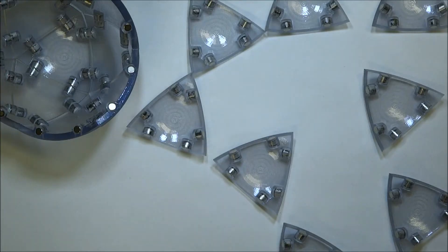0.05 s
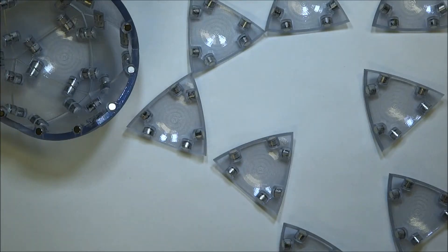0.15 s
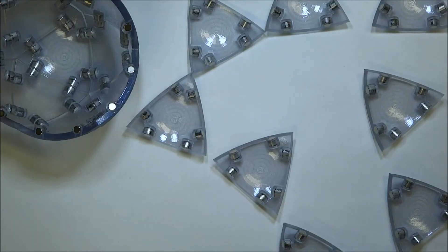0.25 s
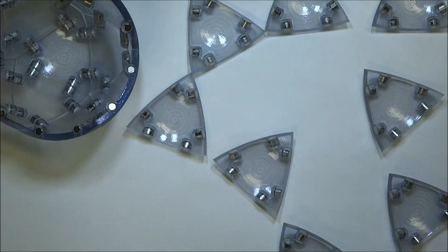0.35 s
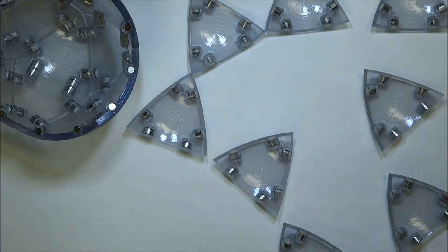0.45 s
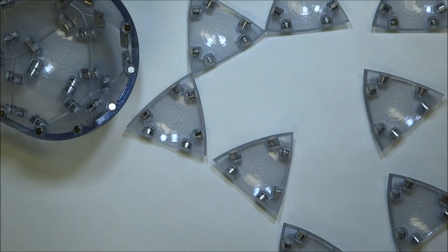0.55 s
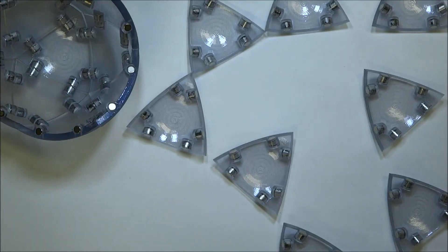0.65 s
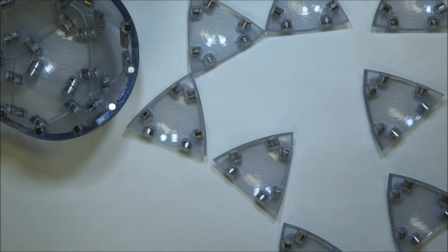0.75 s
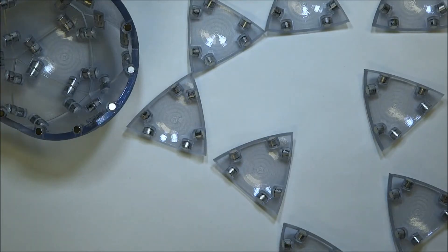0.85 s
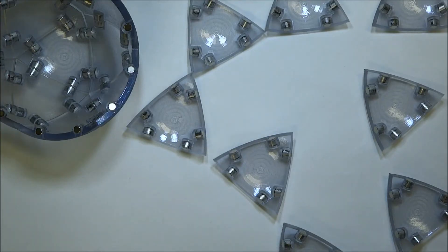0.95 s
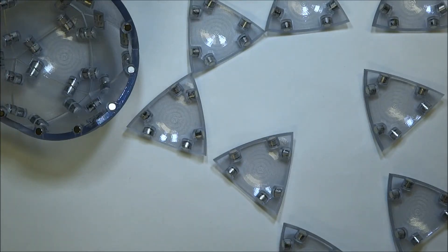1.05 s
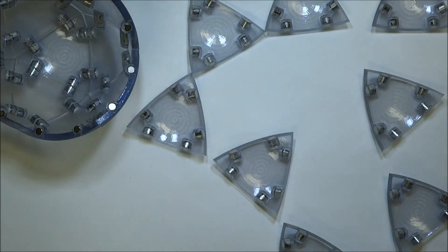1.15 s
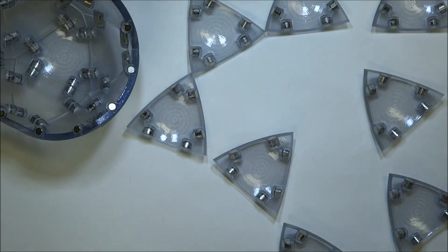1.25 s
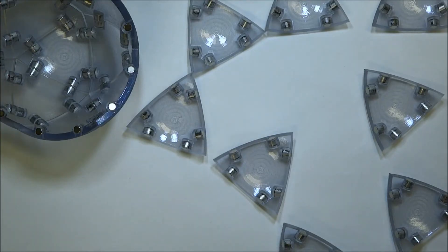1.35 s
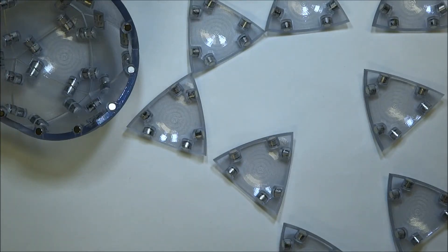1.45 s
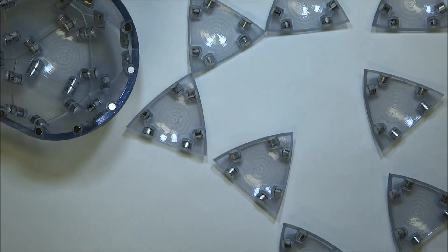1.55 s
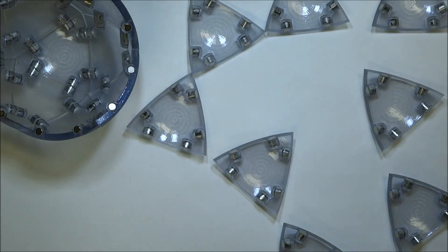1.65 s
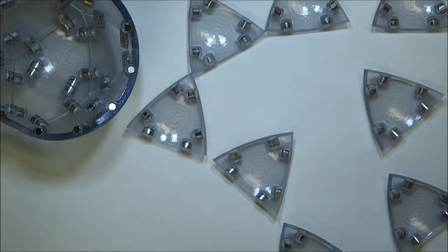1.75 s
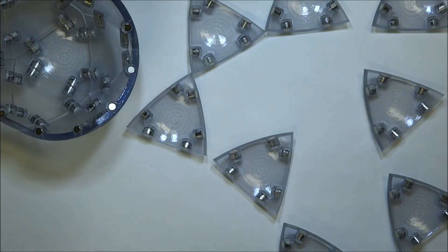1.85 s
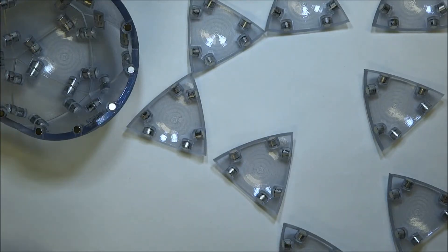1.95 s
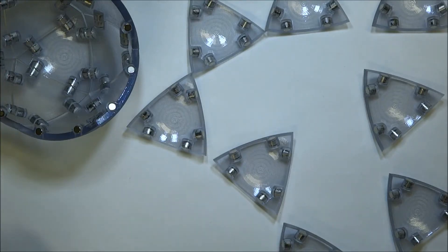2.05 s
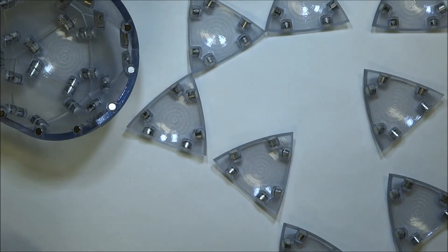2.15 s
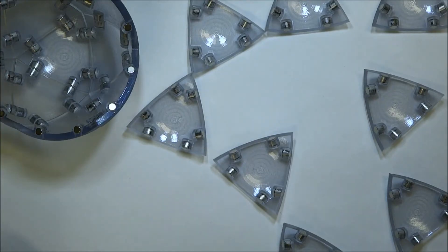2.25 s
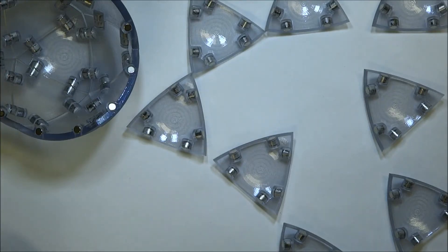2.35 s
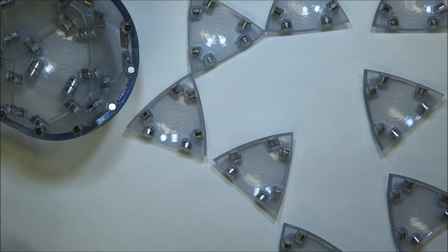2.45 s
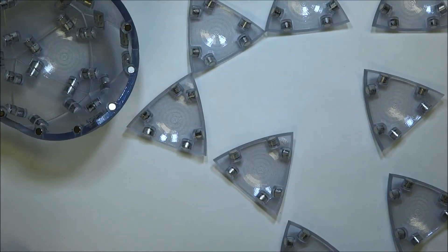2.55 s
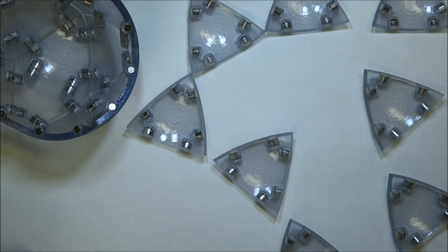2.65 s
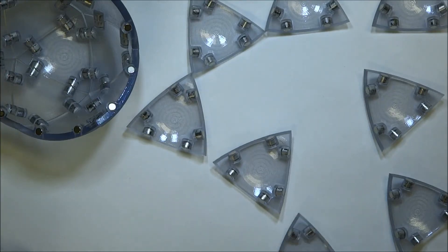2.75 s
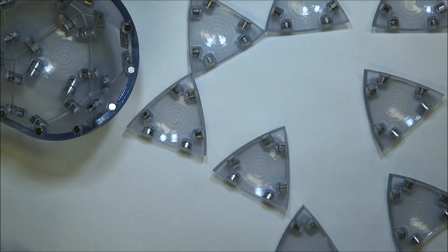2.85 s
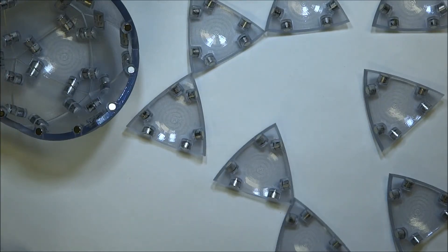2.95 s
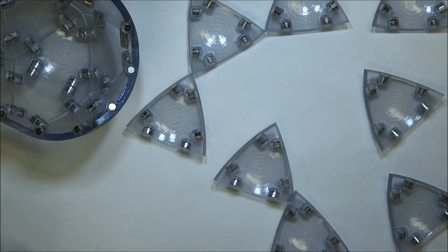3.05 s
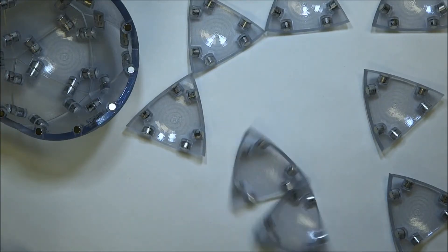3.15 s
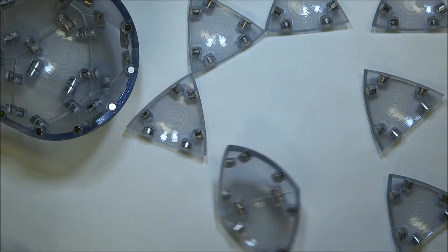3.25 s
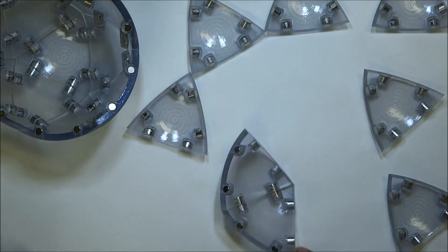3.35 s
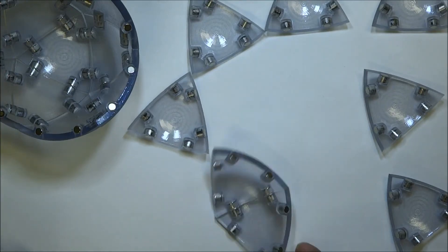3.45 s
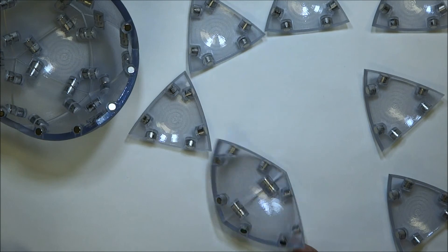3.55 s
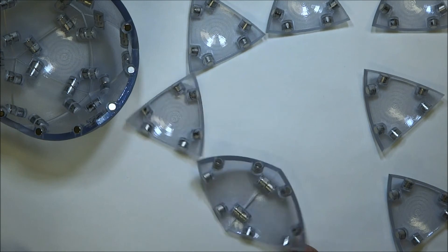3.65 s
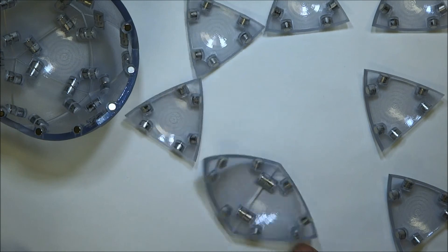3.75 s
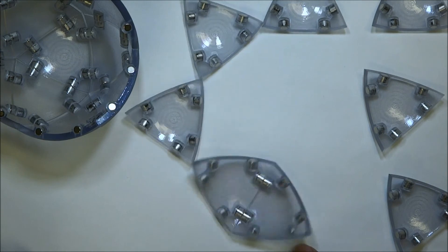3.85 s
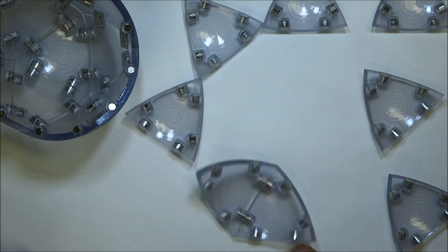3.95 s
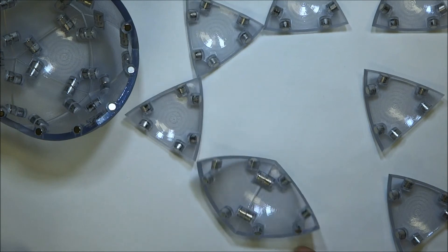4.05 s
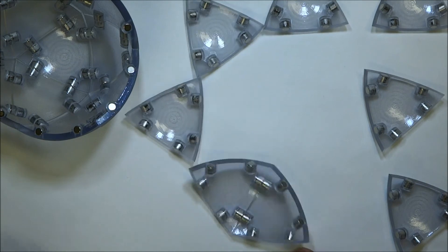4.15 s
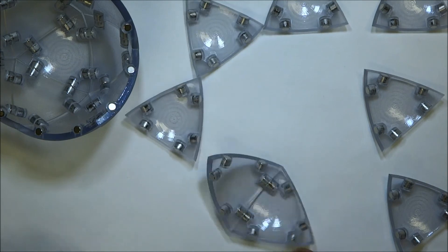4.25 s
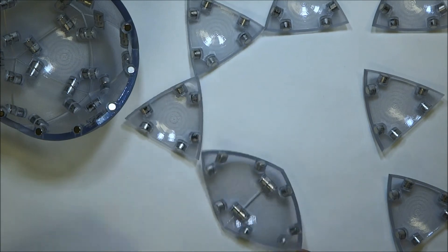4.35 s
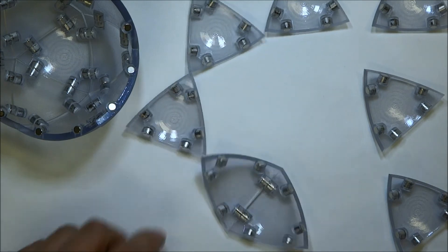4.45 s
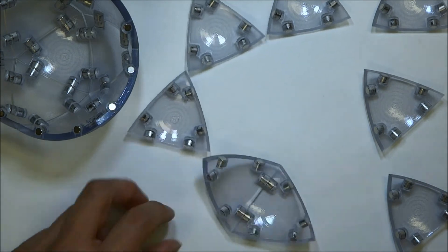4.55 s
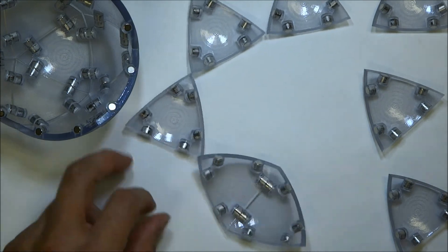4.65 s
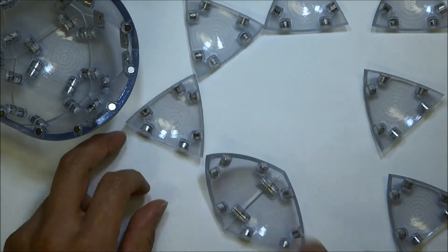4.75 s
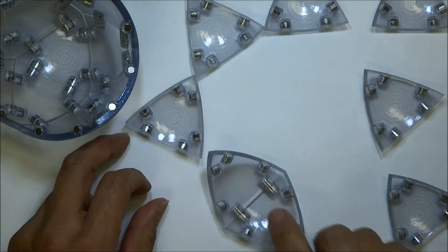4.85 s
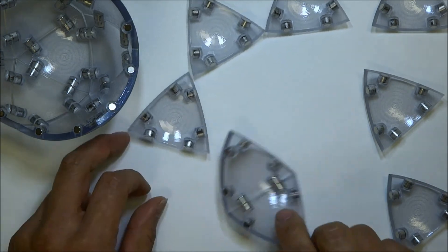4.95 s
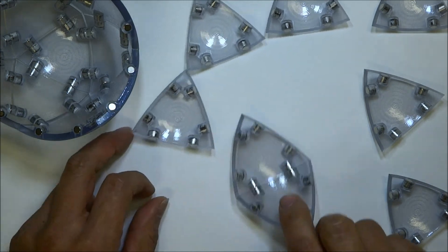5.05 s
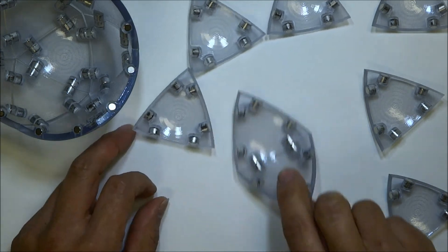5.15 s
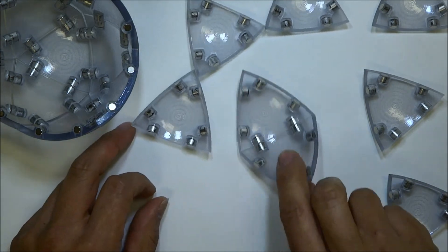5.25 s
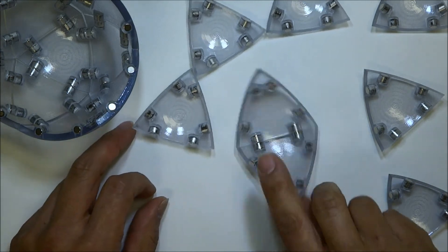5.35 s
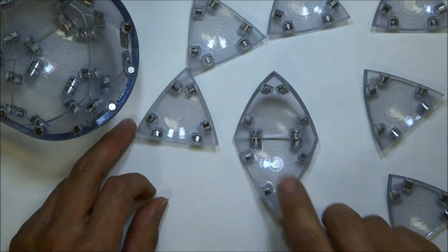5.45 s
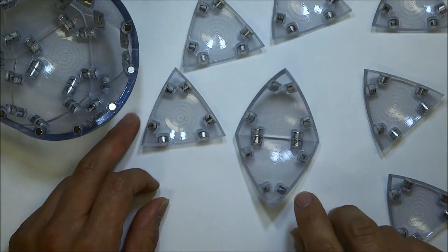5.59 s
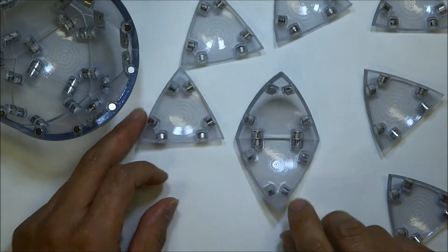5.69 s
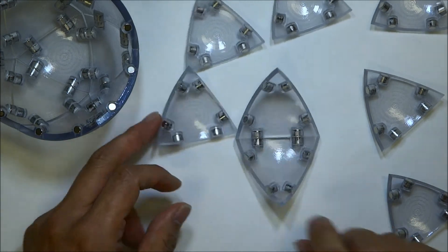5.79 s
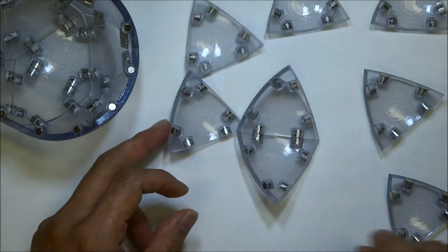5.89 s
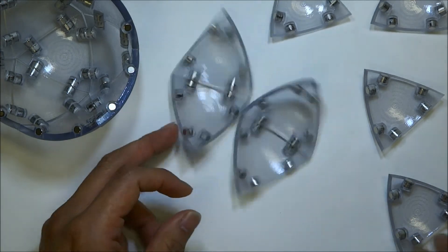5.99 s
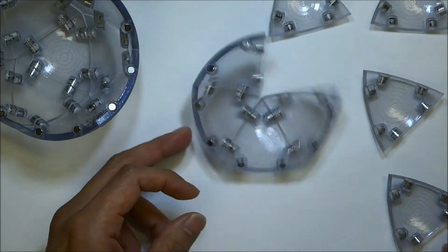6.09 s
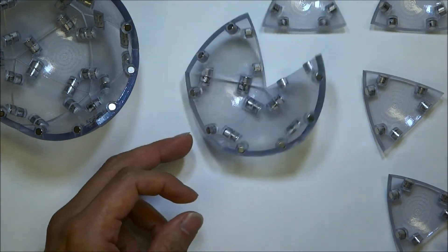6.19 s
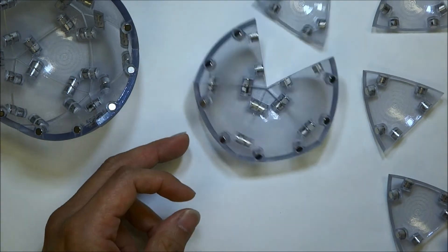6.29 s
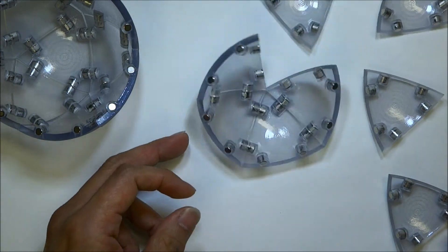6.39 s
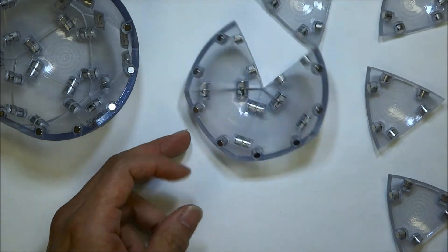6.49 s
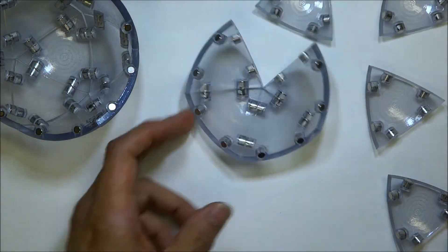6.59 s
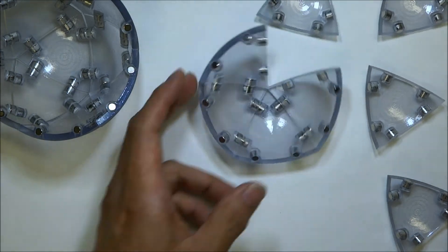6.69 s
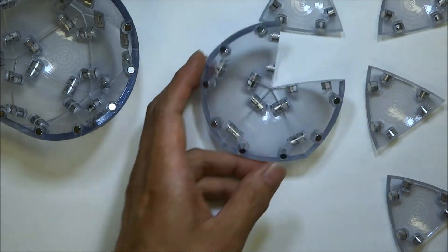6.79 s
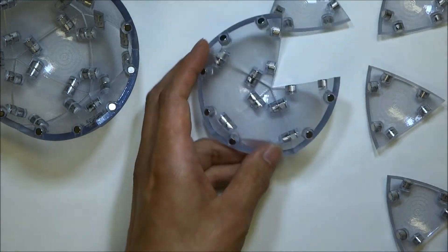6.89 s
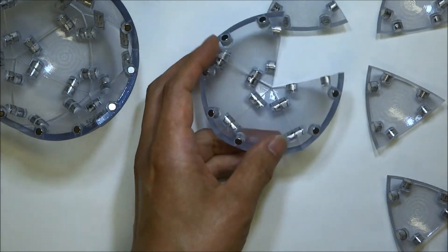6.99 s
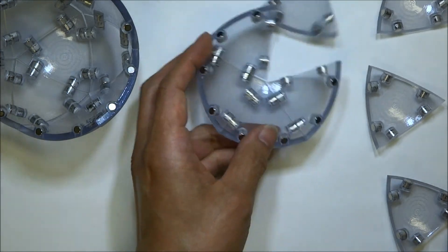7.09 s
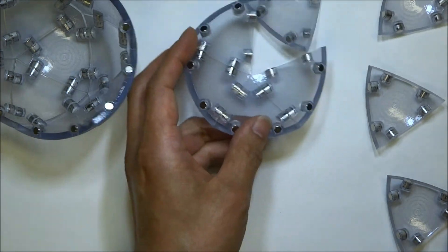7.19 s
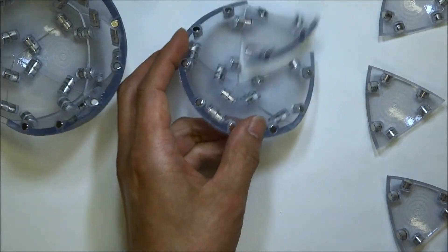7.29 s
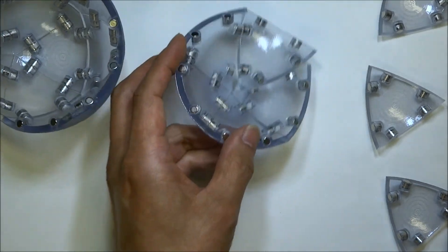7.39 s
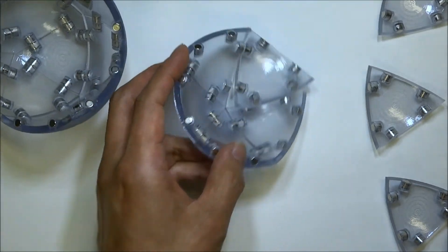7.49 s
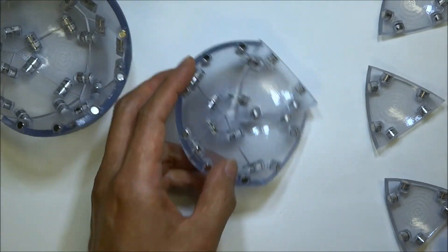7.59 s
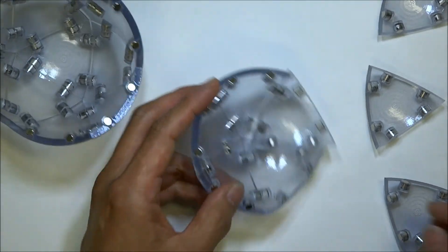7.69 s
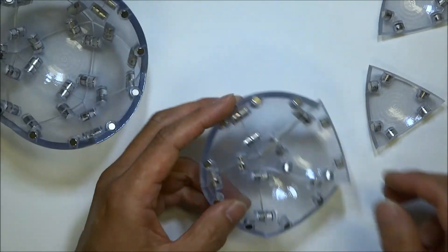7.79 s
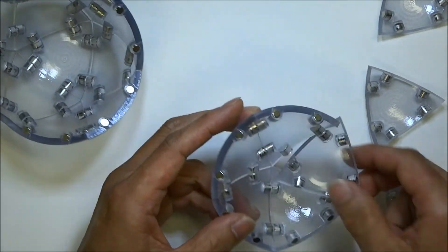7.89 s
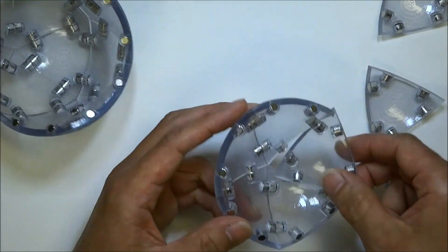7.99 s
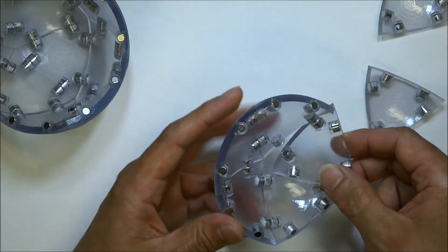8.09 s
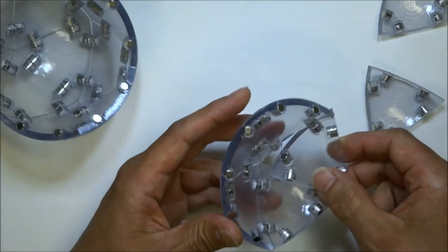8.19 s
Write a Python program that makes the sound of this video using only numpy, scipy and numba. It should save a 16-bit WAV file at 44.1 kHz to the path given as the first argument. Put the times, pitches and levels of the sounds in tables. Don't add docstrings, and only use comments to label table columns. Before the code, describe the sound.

After a quiet fan hum, magnetic plastic pieces snap shut in bright hard clusters, with table knocks, ticks and light finger brushes.

```python
import sys
import numpy as np
from scipy import signal
from scipy.fft import rfft, irfft, next_fast_len
from scipy.io import wavfile
from scipy.ndimage import uniform_filter1d, minimum_filter1d
from numba import njit

SR = 44100
rng = np.random.default_rng(int(sys.argv[2]) if len(sys.argv) > 2 else 0)


def int16_out(signal):
    q = np.round(np.clip(np.atleast_2d(signal).T, -1, 1) * 32767)
    wavfile.write(sys.argv[1], SR, q.astype(np.int16))


def convert_level_to_amplitude(level_db):
    exponent = np.asarray(level_db, float) / 20
    return 10 ** exponent


N = 362943
LEFT_RIGHT = np.array([[1], [-1]])


def coloured(gain_of_hz, size):
    fast = next_fast_len(size)
    hz = np.maximum(np.fft.rfftfreq(fast, 1 / SR), 1)
    spectrum = rfft(rng.standard_normal(fast)) * gain_of_hz(hz)
    return irfft(spectrum, fast)[:size]


def bell(centre_hz, octaves):
    return lambda hz: np.exp(-0.5 * (np.log2(hz / centre_hz) / octaves) ** 2)


def rms(x):
    return np.sqrt(np.mean(x ** 2))


def fans():
    # pitch_hz [Hz], level_db [dB per Hz]
    air_curve = [(12, -46), (20, -8.5), (68, -11.5), (120, -2.5), (154, -7.5), (277, -8), (434, -11.5),
                 (472, -15), (738, -16), (897, -12), (1260, -25), (3740, -27.5), (4810, -24.5),
                 (11100, -30.5), (16000, -37.5)]
    # pitch_hz [Hz], side_minus_mid_db [dB]
    side_curve = [(60, -17), (110, -24), (200, -9), (380, -6.5), (700, -10.5), (1290, -3), (2380, -4),
                  (4400, -7.5), (8120, -13), (15000, -12)]
    # pitch_hz [Hz], width_hz [Hz], over_noise_db [dB]
    hum = [(103, 14.4, 6), (126.8, 4.87, 15), (360.5, 11, 4), (430.3, 1.75, 18), (511.4, 7.4, 7),
           (875.3, 27.6, 12.5), (915, 9.8, 6), (964.4, 6.1, 11.5), (1412, 186, 4.5), (1658, 34, 6.5),
           (13700, 1200, 1), (2375, 50, 4), (4500, 210, 0), (6500, 1700, 1), (10900, 230, 3)]
    # pitch_hz [Hz], level_db [dB]
    whine_tones = [(3945, -69), (4738, -55), (5048, -57.5), (5379, -61), (9476, -67), (15740, -80)]
    air_db, drift_db, waver_rad = -31.5, 0.76, 1.47

    def curve(rows, hz):
        curve_hz, curve_db = np.array(rows).T
        return convert_level_to_amplitude(np.interp(np.log(hz), np.log(curve_hz), curve_db))

    def mid_gain(hz):
        peaks = sum(convert_level_to_amplitude(db) ** 2 / (1 + (2 * (hz - peak_hz) / width_hz) ** 2) for peak_hz, width_hz, db in hum)
        return curve(air_curve, hz) * np.sqrt(1 + peaks)

    mid = coloured(mid_gain, N)
    side = coloured(lambda hz: mid_gain(hz) * curve(side_curve, hz), N)
    drift = coloured(bell(1.5, 2.6), N)
    level = convert_level_to_amplitude(air_db + drift_db * drift / rms(drift)) / rms(mid)
    air = level * (mid + side * LEFT_RIGHT)
    air *= convert_level_to_amplitude(0.15 * LEFT_RIGHT)
    t = np.arange(N) / SR
    waver = coloured(bell(2.4, 1.05), N)
    phase = waver_rad * waver / rms(waver)
    whine = sum(convert_level_to_amplitude(db) * np.sin(2 * np.pi * hz * t + phase) for hz, db in whine_tones)
    return air + np.sqrt(2) * whine


def stick_slip(rows, octaves):
    out = np.zeros(N + SR)
    for start_s, length_s, level_db, centre_hz in rows:
        size, start = int(length_s * SR), int(start_s * SR)
        steps_db = 2.2 * np.repeat(rng.standard_normal(SR // 64), 64)[:size]
        hiss = coloured(bell(centre_hz, octaves), SR // 2)[:size] * convert_level_to_amplitude(steps_db)
        fade = signal.windows.tukey(size, 0.75)
        out[start:start + size] += convert_level_to_amplitude(level_db) * hiss / rms(hiss) * fade
    return out[:N]


def brushes():
    strokes = [
        (2.747, 0.38, -52, 7040),
        (4.403, 0.057, -35, 6500),
        (5.036, .1, -34, 11500),
        (5.215, .075, -33.5, 7400),
        (5.801, 0.091, -39.5, 8000),
        (6.04, 0.065, -38, 4500),
        (6.93, 0.083, -46, 7100),
        (7.124, 0.026, -32, 6500),
        (7.26, .08, -45.5, 6000),
        (7.879, 0.14, -35.5, 6500),
    ]
    return stick_slip(strokes, octaves=1.4)


def burst(hz, octaves, t60, t):
    noise = coloured(bell(hz, octaves), len(t))
    return noise / rms(noise) * convert_level_to_amplitude(-60 * t / t60)


def ring(modes, db, t, near_hz=1000.0, reach_db=0.0):
    scatter_db, detune = 1.8, 0.0079
    push_db, push_cycles = -3.5, 11.2
    hz, mode_db, t60 = np.array(modes).T[:, :, None]
    chance = rng.standard_normal((2, len(modes), 1))
    sense = (-1.0) ** np.arange(len(modes))[:, None]
    far_db = reach_db * np.log2(hz / near_hz) ** 2
    gain = sense * convert_level_to_amplitude(db + mode_db + scatter_db * chance[1] - far_db) / np.sqrt(len(modes))
    tone = gain * np.sin(2 * np.pi * hz * (1 + detune * chance[0]) * t)
    push = convert_level_to_amplitude(push_db - 60 * t * hz / push_cycles)
    return np.sum(tone * (convert_level_to_amplitude(-60 * t / t60) + push), axis=0)


def strike(out, start_s, main_hz, shell_db, magnet_db, knock_db, table_db):
    # pitch_hz [Hz], level_db [dB], t60_s [s]
    shell_modes = [(1900, -21, 0.007), (2400, -1, 0.0063), (3210, 9, 0.01), (3570, 6.5, 0.014),
                   (3940, -17, 0.005), (4370, 6.5, 0.0086), (5000, 10, 0.0062), (5350, 2.5, 0.017),
                   (5910, 13, 0.0044)]
    magnet_modes = [(6860, 3, 0.017), (7320, 9, 0.007), (8850, 9, 0.0039), (10050, -11, 0.0085),
                    (10600, -4, .004), (11150, 3.5, 0.0054), (12800, -10, 0.0043), (14400, -12, .005)]
    knock_modes = [(724, -11, 0.015), (956, 1.5, 0.052), (1220, -1.5, 0.042), (1574, 3.5, 0.013),
                   (1625, -18, 0.025), (2080, 0, 0.0068)]
    table_modes = [(127, -3, 0.086), (263.7, 0.5, 0.14), (334, -2, 0.047), (422, 1.5, 0.029),
                   (571, 6.5, 0.025), (666, 0.5, 0.027)]
    dome_hz, free_t60_s, clamped_t60_s = 3230, 0.032, 0.0092
    crack_db, rattle_db, rattle_t60_s, rumble_db = 2.5, -14.5, 0.049, -5.5

    t = np.arange(SR // 8) / SR
    rings_free = abs(main_hz - dome_hz) < 180 and shell_db < -4
    t60 = free_t60_s if rings_free else clamped_t60_s
    sense = (-1.0) ** np.argmin(np.abs(np.array(shell_modes)[:, 0] - main_hz))
    blow = sense * convert_level_to_amplitude(shell_db + 3.5 - 60 * t / t60) * np.sin(2 * np.pi * main_hz * t)
    blow += ring(shell_modes, shell_db, t, main_hz, reach_db=18.0)
    blow += ring(magnet_modes, magnet_db, t)
    blow += ring(knock_modes, knock_db, t)
    blow += ring(table_modes, table_db, t)
    blow += convert_level_to_amplitude(magnet_db + crack_db) * burst(9800.0, 0.6, 0.0054, t)
    blow += convert_level_to_amplitude(shell_db + rattle_db) * burst(main_hz, 0.3, rattle_t60_s, t)
    blow += convert_level_to_amplitude(magnet_db + rattle_db) * burst(11700.0, 1.0, rattle_t60_s, t)
    blow += convert_level_to_amplitude((knock_db + table_db) / 2 + rumble_db) * burst(700, 0.76, 0.11, t)
    start = int(start_s * SR)
    out[start:start + len(t)] += blow * np.minimum(t / 0.00034, 1)


def thuds():
    bumps = [
        (3.033, -28.5),
        (3.071, -27.5),
        (3.619, -20),
        (5.241, -32),
        (6.596, -21.5),
        (6.719, -27.5),
        (7.003, -26),
    ]
    out = np.zeros(N + SR)
    for start_s, table_db in bumps:
        strike(out, start_s, 3700, table_db - 30, table_db - 30, table_db - 16, table_db)
    return out[:N]


def ticks():
    touches = [(3.033, 3220, -36.5, -30), (4.4, 5970, -29, -28), (4.459, 5860, -31, -27),
               (4.998, 4500, -33, -46), (5.51, 5500, -53, -32), (5.241, 5250, -31, -46),
               (5.895, 2900, -30, -36), (6.0236, 2690, -23, -27), (6.088, 4700, -30, -43),
               (6.9843, 2620, -20, -24), (7.281, 3200, -35, -63), (7.325, 4500, -33, -50),
               (7.3935, 3160, -30, -71), (7.89, 2980, -35, -24.5), (7.937, 6000, -35, -31)]
    out = np.zeros(N + SR)
    for start_s, main_hz, shell_db, magnet_db in touches:
        strike(out, start_s, main_hz, shell_db, magnet_db, shell_db - 23, shell_db - 16)
    return out[:N]


def skids():
    scrapes = [
        (3.238, 0.037, -34.5, 700),
        (3.404, 0.054, -17, 1700),
        (3.404, 0.072, -22.5, 590),
        (5.865, 0.07, -26.5, 814),
        (6.025, 0.048, -25, 790),
        (6.259, .11, -27.5, 76),
        (6.264, 0.0476, -14, 1500),
        (6.993, 0.043, -32.5, 280),
        (7.4165, 0.025, -26.5, 1820),
    ]
    return stick_slip(scrapes, octaves=0.41)


def landings():
    rocks = [
        (3.246, -32, -22.5),
        (3.253, -29, -29),
        (3.7051, -8, -14),
        (5.861, -16, -17),
        (5.921, -24, -19),
        (5.979, -23, -20),
        (6.0355, -16, -17),
        (6.178, -7.5, -12.5),
        (6.271, -19, -15),
        (6.285, -24, -18),
    ]
    out = np.zeros(N + SR)
    for start_s, knock_db, table_db in rocks:
        strike(out, start_s, 3700, knock_db - 14, knock_db - 19, knock_db, table_db)
    return out[:N]


def snaps():
    closings = [(3.2906, 4100, 9.5, 5.5, -6.5), (3.295, 3870, 5.5, 6.5, -12), (3.322, 3930, -4, -24, -6),
                (3.3996, 3880, 8.5, -12, 1.5), (3.408, 5600, -3, -8, -19), (3.6931, 3210, -16.5, -25, -12),
                (6.1026, 3900, 12, 14.5, -5), (6.105, 3460, -11, -1, -15), (6.188, 5240, -10, -30, -8),
                (6.1938, 3670, 8.5, 2, -2.5), (6.205, 4000, 12.5, 6, -14), (6.2134, 5000, -22, -18, -11),
                (3.7053, 2410, -24, -50, -34), (6.221, 3480, -16, -26, -11), (6.2587, 2600, 1, -15, 0),
                (7.4181, 4170, -9, -13.5, -38)]
    out = np.zeros(N + SR)
    for start_s, main_hz, shell_db, magnet_db, knock_db in closings:
        strike(out, start_s, main_hz, shell_db, magnet_db, knock_db, knock_db - 11)
    return out[:N]


def squeaks():
    drags = [
        (7.12, .044, -44, 4200),
        (7.2, .033, -45, 4400),
        (9.1, .043, -41, 4550),
        (7.97, 0.091, -40, 8700),
        (7.96, .14, -43, 7100),
    ]
    return stick_slip(drags, octaves=0.08)


def room(x):
    # pitch_hz [Hz], t60_s [s], level_db [dB], side_colour_db [dB]
    bands = [(179, 0.34, 3.5, -3), (405, 0.46, 4.5, 2), (895, 0.35, 2.5, -4.5), (1910, 0.32, 5, -1.5),
             (4000, 0.33, -4.5, -2.5), (7500, 0.34, -2.5, -3), (13000, 0.3, -6, -9)]
    room_db, side_level_db = -33, -9.5
    first_wall_s, build_s = 0.0028, 0.011
    ceiling_s, ceiling_db, ceiling_smear_s = 0.0125, -1.5, 0.0029
    t = np.arange(SR // 2) / SR
    swell = 1 - np.exp(-np.maximum(t - first_wall_s, 0) / build_s)
    swell += convert_level_to_amplitude(ceiling_db) * (t > ceiling_s) * np.exp(-np.abs(t - ceiling_s) / ceiling_smear_s)
    mid, side = np.zeros(len(t)), np.zeros(len(t))
    for hz, t60, db, side_db in bands:
        decay_db = db - 60 * t / t60
        mid += convert_level_to_amplitude(decay_db) * coloured(bell(hz, 0.53), len(t))
        side += convert_level_to_amplitude(decay_db + side_db) * coloured(bell(hz, 0.53), len(t))
    echo = convert_level_to_amplitude(room_db) * swell * (mid + convert_level_to_amplitude(side_level_db) * side * LEFT_RIGHT)
    return signal.fftconvolve(x[None], echo, axes=1)[:, :N]


def scene():
    air = fans()
    near = brushes() + thuds() + ticks() + skids() + landings() + snaps() + squeaks()
    return near + room(near) + air


@njit
def recover(need, step):
    gain, g = np.empty(len(need)), 1.0
    for i in range(len(need)):
        g = min(need[i], g + step * (1 - g))
        gain[i] = g
    return gain


def duck(x):
    threshold_db, knee_db, depth_db = -5, 8, -5
    fall_s, hold_s, back_s = 0.12, 0.67, 0.6
    peak_db = 20 * np.log10(np.abs(x).max(axis=0) + 1e-9)
    over = np.clip((peak_db - threshold_db) / knee_db, 0, 1)
    hold, fall = int(hold_s * SR) // 2, int(fall_s * SR) // 2
    need = minimum_filter1d(convert_level_to_amplitude(depth_db * over), 2 * hold + 1, origin=hold, mode="nearest")
    gain = recover(need, 1 / (back_s * SR))
    return uniform_filter1d(gain, 2 * fall + 1, origin=fall, mode="nearest")


def limit(x):
    ceiling, ahead_s, recover_s = 0.98, 0.0018, 0.018
    ahead = int(ahead_s * SR)
    need = np.minimum(ceiling / (np.abs(x).max(axis=0) + 1e-9), 1)
    need = minimum_filter1d(need, ahead + 1, origin=-(ahead // 2))
    gain = uniform_filter1d(recover(need, 1 / (recover_s * SR)), size=9)
    return np.clip(x * gain, -1, 1)


def top_cut(x):
    return signal.sosfilt(signal.butter(12, 16510, fs=SR, output="sos"), x)


def record(dry):
    band_limit = signal.ellip(10, 0.3, 60, 15770, fs=SR, output="sos")
    x = signal.sosfilt(band_limit, dry)
    x = x * duck(x)
    return top_cut(limit(x))


dry = scene()
out = record(dry)
int16_out(out)
```